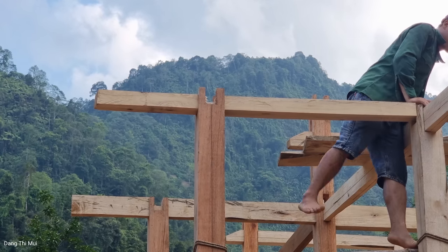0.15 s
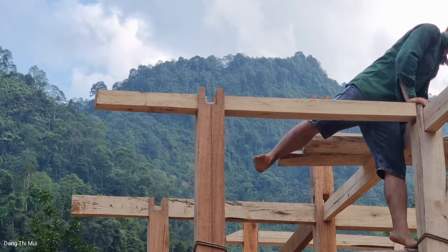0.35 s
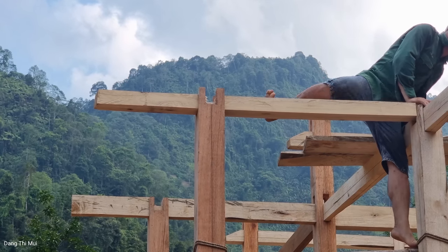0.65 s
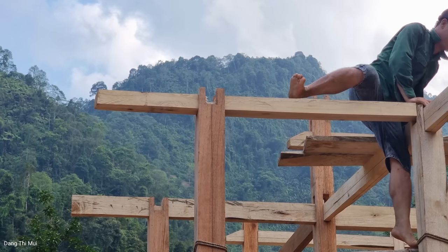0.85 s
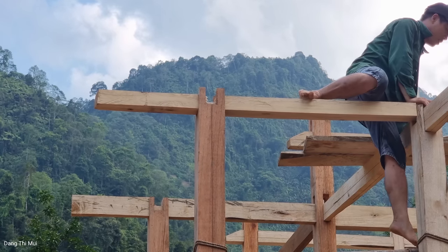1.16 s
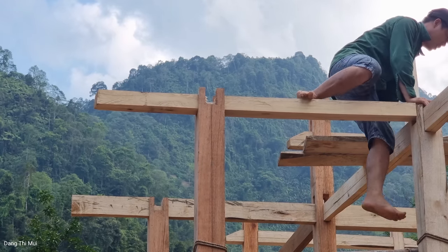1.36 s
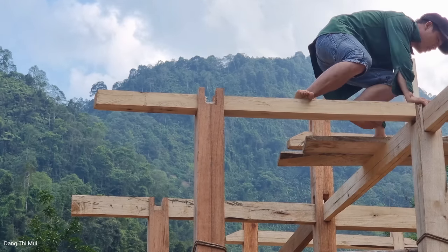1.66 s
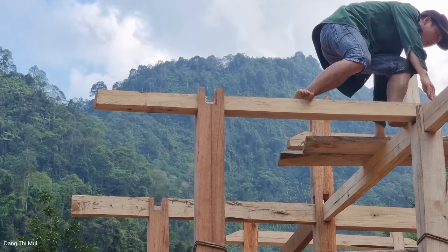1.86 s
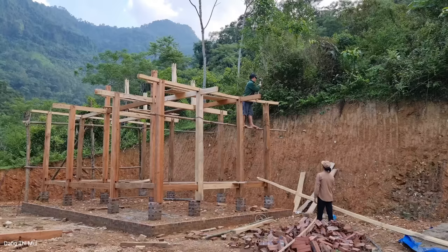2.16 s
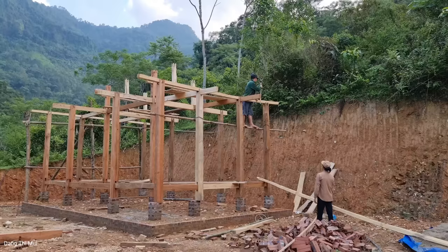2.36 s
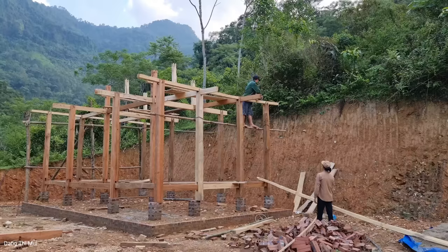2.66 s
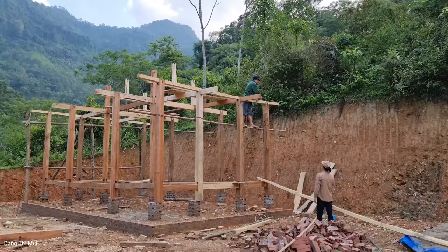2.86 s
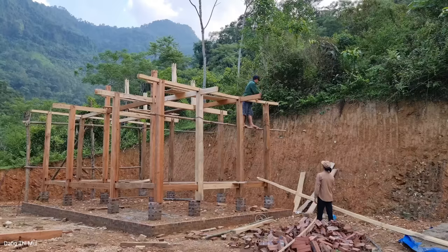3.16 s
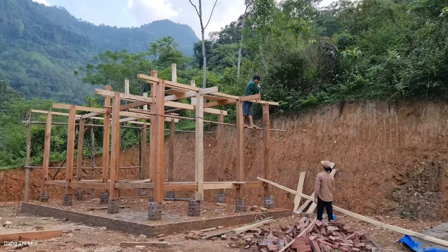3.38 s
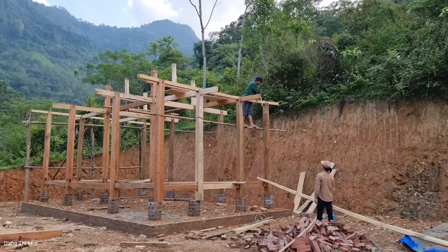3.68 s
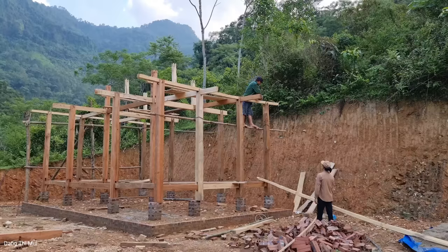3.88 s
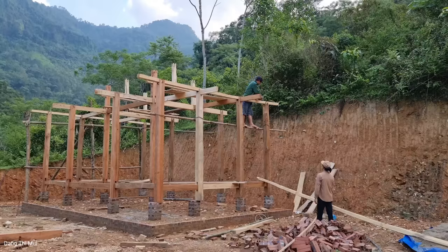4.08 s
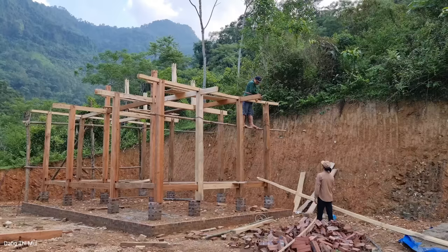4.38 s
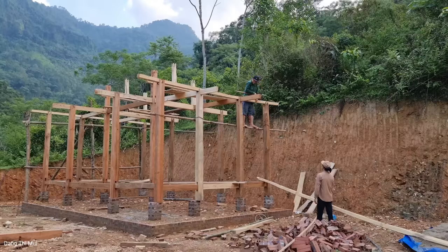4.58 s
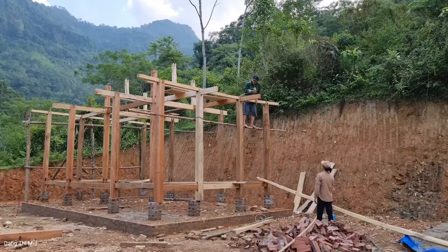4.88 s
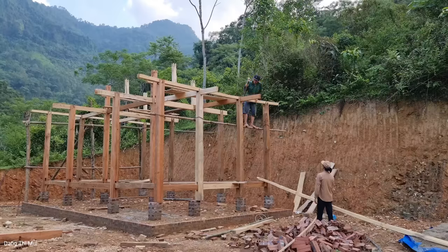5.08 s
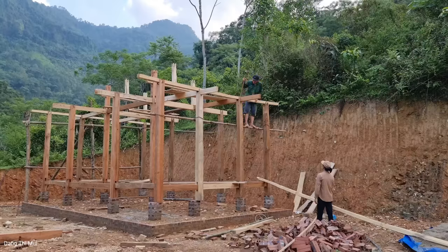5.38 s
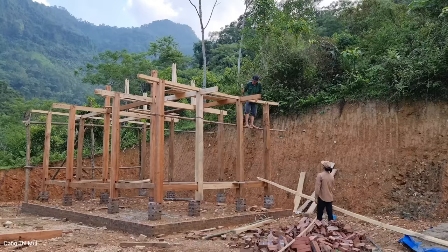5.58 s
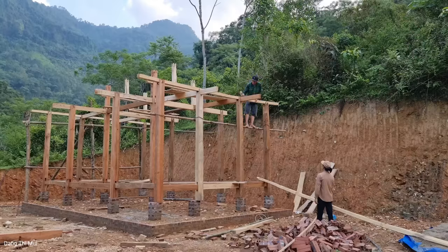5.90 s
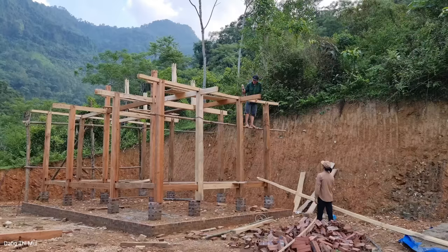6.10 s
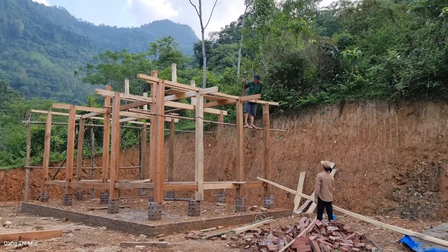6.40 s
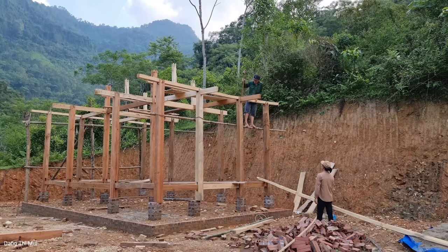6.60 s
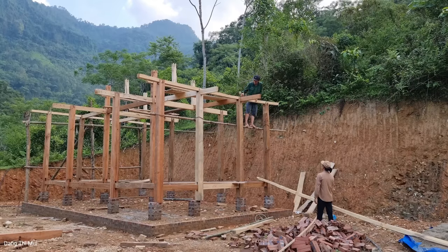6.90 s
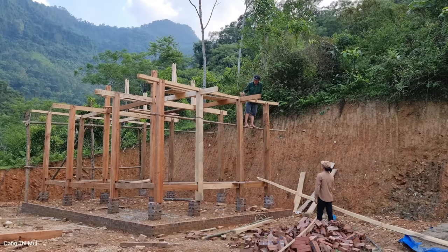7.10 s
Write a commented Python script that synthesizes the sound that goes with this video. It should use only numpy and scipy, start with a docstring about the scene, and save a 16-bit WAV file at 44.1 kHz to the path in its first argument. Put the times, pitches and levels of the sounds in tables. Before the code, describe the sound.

Soft bumps and scuffs of a person climbing on wooden planks sound near the microphone, under a shrill drone of cicadas. After a short dip in the sound, four loud, sharp hammer blows on a timber frame come from farther off, in two slow pairs, with duller knocks of loose wood and a few light taps. The insects keep buzzing throughout in the open air.

```python
"""Hammering a timber frame in the forest

From beside a house frame on a wooded hillside, someone is heard climbing over planks with soft bumps.
The sound fades out and returns from across the yard, where a heavy hammer drives a beam home: four
hard knocks, each ringing the wood and shaking the frame. Near cicadas swell, hold and sag in pitch
as their tymbals wind down, over the buzz and hiss of many far ones."""
import sys
import numpy as np
from scipy import signal
from scipy.fft import rfft, irfft
from scipy.io import wavfile
from scipy.ndimage import map_coordinates

SR = 44100
rng = np.random.default_rng(int(sys.argv[2]) if len(sys.argv) > 2 else 0)


def to_wav(s):
    """Save 16-bit WAV."""
    ch = np.atleast_2d(s).T  # columns
    pcm = np.round(np.clip(ch, -1, 1) * 32767)  # PCM
    wavfile.write(sys.argv[1], SR, pcm.astype(np.int16))


N = 319719
TIME = np.arange(N) / SR
AGE = TIME[:2 ** 15]   # seconds since a strike
BAND_HZ = 40 * 2 ** (np.arange(27) / 3)
LEFT_RIGHT = np.array([[.5], [-.5]])   # splits a difference between the channels
MOVE_S = 2.212   # the microphones move from beside the frame to across the yard


# The hammer, from across the yard. Each row: start in seconds, level in dB, joint ring in Hz and dB,
# thud, clack, crack and rumble in dB, a factor on the frame's ring time, swell in seconds.
HAMMER_BLOWS = [(2.678, 2, 455, -20, 2, -0.5, 2, -3, 0.97, 0.0098),
                (3.873, 4, 405.6, -12.5, 3, -3, -6, -3, 0.88, 0.0095),
                (5.748, 3.5, 466.4, -19, 3.5, -0.5, -1.5, -2, 1.27, 0.011),
                (6.944, 4, 445, -31, 0.5, 0.5, -2.5, -3.5, 1.11, 0.014)]
# The struck beam's clear modes. Each row: pitch in Hz, level in dB, seconds to die by 60 dB (t60).
BEAM_MODES = [(368.6, -19.5, 0.13), (455.3, -18, 0.11), (532.4, -19.5, 0.12), (570, -23, 0.12),
              (638, -32.5, 0.13), (734, -31.5, 0.18), (795, -24.5, 0.11), (864, -17.5, 0.13),
              (985, -22, .12), (1055.5, -25, 0.12), (1160, -23.5, 0.13), (1385, -27.5, 0.16),
              (1517, -32.5, 0.082), (1663, -37, .14), (1950, -39, 0.22)]
# Dense modes of the struck wood. Each row: band in Hz, level in dB, t60 in seconds.
WOOD_BANDS = [(50, -62, .1), (144, -35, .1), (300, -39.5, 0.083), (400, -19, .08), (660, -19, 0.09),
              (900, -19, 0.096), (1390, -23.5, 0.19), (1720, -32, 0.14), (2700, -29.5, 0.11),
              (4070, -33.5, 0.048), (6500, -42.5, 0.16), (10600, -38.5, 0.075), (14900, -46, .13)]
# The whole frame shaking after a blow. Each row: band in Hz, level in dB, t60 in seconds.
FRAME_BANDS = [(40.8, -56, .55), (80, -41.5, 0.44), (160, -38, 0.43), (270, -42, 0.48), (420, -31.5, .5),
               (700, -28, 0.19), (1085, -32, 0.39), (1800, -47, 0.63), (3500, -52, 0.43), (8014, -52, 0.38),
               (15000, -54.5, .22)]
# Fibres cracking as the tenon slips on. Each row: start in seconds, level in dB.
FIBRE_CRACKS = [(3.885, 0), (3.915, 4), (5.784, -6.5), (6.977, -3), (6.999, -8)]
# The tone of one such crack. Each row: band in Hz, level in dB, t60 in seconds.
FIBRE_BANDS = [(300, -72, .05), (900, -33, .06), (1800, -39.5, 0.085), (3500, -40, 0.11),
               (8000, -40.5, .09), (15000, -41.5, 0.12)]
def hammer():
    """Each blow rings the beam and its joint, cracks as the tenon seats, and shakes the frame."""
    out = np.zeros((2, N))
    for s, db, joint_hz, joint_db, thud_db, clack_db, crack_db, rumble_db, hold, swell in HAMMER_BLOWS:
        def colour_db(hz):
            """Where and how squarely the head lands tilts the tone."""
            return (thud_db * bell(hz, 640, 0.97) + clack_db * bell(hz, 950, 0.55)
                    + crack_db * bell(hz, 3200, 0.91))
        modes = [(hz, level + colour_db(hz), t60) for hz, level, t60 in BEAM_MODES]
        beam = ring(modes + [(joint_hz, joint_db, .2)], swell, spread=1.4, chance_db=0.5)
        wood = dense_modes(WOOD_BANDS, swell * 0.83, alike_below_hz=2100, colour_db=colour_db(BAND_HZ))
        frame = dense_modes(stretch(FRAME_BANDS, hold), 0.022, alike_below_hz=1900, bass_lag_hz=70)
        frame *= from_db(1.3 * drift(55)[:len(AGE)])   # shaking passes unevenly from joint to joint
        posts = ring(stretch([(85.9, -37, .5), (155.4, -46, .64)], hold), .027, spread=.5, chance_db=3.5)
        seat = (AGE - swell) / .00016
        crack = from_db(-3.5 + crack_db) * -seat * np.exp(-seat ** 2)
        add(out, s, from_db(db) * (beam + wood + crack + from_db(rumble_db) * (frame + posts)))
    for s, db in FIBRE_CRACKS:
        add(out, s, from_db(db) * dense_modes(FIBRE_BANDS, 0.001, alike_below_hz=2000))
    return out


# Lighter knocks, across the yard: timbers settling in their joints, and at 3.932 s the hammer landing a second
# time just after a blow. Each row: start in seconds, level in dB, low-pass edge in Hz.
TIMBER_KNOCKS = [(2.868, -32.5, 2000), (3.932, -12, 1685), (4.071, -17.5, 850), (4.094, -21.5, 440),
                 (5.685, -24.5, 900), (5.808, -32, 1800), (5.865, -17.5, 1610), (5.915, -19, 700),
                 (5.973, -36, 1500), (6.186, -35.5, 80), (7.085, -19.5, 820), (7.136, -28, 990)]
def light_knocks():
    """Timbers knock in their joints and the hammer lands once more after a blow, all duller and lighter than a
    full blow on the same wood."""
    out = np.zeros((2, N))
    for s, db, dull_hz in TIMBER_KNOCKS:
        knock = from_db(1) * ring(stretch(BEAM_MODES, 1.1), 0.0054, spread=0.93, chance_db=1.5)
        shake = from_db(8.5) * dense_modes(stretch(FRAME_BANDS, 0.66), 0.0091, alike_below_hz=730)
        add(out, s, from_db(db) * butter(knock + shake, dull_hz, "low"))
    return out


# Sliding over the beam, close by. Each row: start and length in seconds, level in dB.
BEAM_SLIDES = [(0.036, 0.091, -59), (0.178, 0.53, -76.5), (0.732, 0.516, -69)]
def sliding():
    """The climber rubs along the wood: low, uneven noise that eases in and out."""
    edge_s = 0.088
    gain = sum(from_db(db) * ramp(s, edge_s) * ramp(s + length, -edge_s) for s, length, db in BEAM_SLIDES)
    rub = steady_noise([(240, -18), (335, 3), (420, -7), (600, -10)], 140, 620, likeness=0.8)
    return gain * rub * from_db(2 * drift(14.15))


# Feet and knees, close by. Each row: start in seconds, level in dB, upper knock in dB.
PLANK_STEPS = [(0.349, -46.5, -4), (0.411, -53.5, -10), (0.47, -57, 2), (0.754, -51, 2),
               (1.224, -53.5, 3.5), (1.261, -51.5, -26), (1.414, -52, -19), (1.46, -45, -6),
               (1.647, -45, -4), (1.697, -43.5, -7), (1.743, -43, -8), (1.775, -46.5, -3),
               (1.832, -46.5, -13), (1.974, -50, -2)]
# The planks underfoot. Each row: pitch in Hz, level in dB, t60 in seconds.
PLANK_MODES = [(235, -5.5, 0.18), (307, 2, 0.12), (395, -9.5, 0.37), (511, -4.5, 0.24), (569, -12, 0.35),
               (780, -17, 0.092), (890, -5.5, 0.23), (1080, -4, 0.2), (1130, -4.5, 0.22),
               (1283, -1.5, 0.093), (1508, -2, 0.077), (1750, -7, .1)]
def climber():
    """Each soft bump rings the planks and scuffs them."""
    out = np.zeros((2, N))
    for s, db, upper_db in PLANK_STEPS:
        tuning = 1 + .025 * rng.normal()   # weight on another spot retunes the planks
        modes = [(hz * tuning, level + (upper_db + 2.5) * bell(hz, 1600, 0.83), t60)
                 for hz, level, t60 in PLANK_MODES]
        friction = rms_one(butter(stereo_noise(0.2, len(AGE)), [215, 1450], "band", order=4))
        scuff = from_db(-11) * friction * swell_and_die(0.00096, 0.19)
        plank = from_db(-12) * ring(modes, 0.0055, spread=0.99, chance_db=4.5)
        add(out, s, from_db(db) * (plank + scuff))
    return out


# Taps between blows, across the yard. Each row: start in seconds, level in dB.
WOOD_TAPS = [(4.773, -50), (4.809, -42), (5.297, -53.5), (6.775, -50.5)]
# The tone of one tap. Each row: band in Hz, level in dB, t60 in seconds.
TAP_BANDS = [(400, -52, .08), (850, -14, 0.078), (1400, -8.5, 0.073), (1810, 0, 0.026), (3000, -33, .04),
             (8000, -45, .03)]
def taps():
    """Light touches briefly stir the wood's dense modes."""
    out = np.zeros((2, N))
    for s, db in WOOD_TAPS:
        add(out, s, from_db(db + 0.5) * dense_modes(TAP_BANDS, 0.0012, alike_below_hz=1600))
    return out


# Three cicada songs, near the microphones. Each row: partial in Hz, level in dB.
SHRILL_PARTIALS = [(2676, -85), (2972, -79), (3128, -75), (3273, -58), (3569, -63.5), (3865, -81),
                   (4167, -58.5), (4463, -58), (4759, -57.5), (5055, -57.5), (5351, -53), (5647, -65),
                   (6243, -85), (6540, -75)]
LOW_PARTIALS = [(2401, -73), (2702, -63), (3004, -60.5), (3138, -59.5), (3305, -61), (3607, -61),
                (3903, -62), (4054, -69), (4204, -55.5), (4355, -64.5), (4495, -66), (4657, -60),
                (4791, -76.5), (4969, -59), (5103, -68.5), (5238, -71), (5545, -69), (6008, -84),
                (6158, -73.5), (6293, -66)]
FALLING_PARTIALS = [(2283, -62), (2422, -64), (2568, -68.5), (2710, -62), (2853, -56.5), (2998, -53),
                    (3138, -60), (3282, -59), (3424, -57), (3567, -60.5), (3709, -62.5), (3852, -61.5),
                    (3995, -67.5), (4136, -61.5), (4422, -57.5), (4708, -54), (4992, -58), (5136, -65.5),
                    (5278, -61.5), (5565, -69), (5990, -71), (6135, -61), (6420, -61), (6885, -75.5)]
# The abdomen's resonance in each song. Each row: time in seconds, centre in Hz.
SHRILL_BODY = [(.1, 5380), (.2, 5100), (.36, 5030), (.6, 4500), (1.1, 4200)]
LOW_BODY = [(1.0, 2820), (1.3, 2700), (1.65, 2770), (1.85, 3070)]
FALLING_BODY = [(2.7, 3153), (3.15, 3540), (3.7, 3454), (4.5, 4826)]
# The calls. Each row: microphone spot, song, end of swell and start of dying in seconds, level in dB,
# dying in dB per second, resonance lift in dB, waver as a share of speed, flicker in dB,
# left minus right in dB and in radians.
NEAR_CALLS = [("frame", "shrill", 0, .02, 9, 11.6, 6.6, 0.00053, 1.4, 3.3, 0.44),
              ("frame", "low", 1.32, 1.72, 9.6, 11, 10.9, 0.0017, 2.85, 0.22, 0.43),
              ("yard", "falling", 2.5, 2.15, 4.6, 6.2, 4.5, .0017, 4.5, 1.5, 0.5),
              ("yard", "falling", 1.6, 4.5, -3, 12, 4.5, 0.0018, 3.5, 2, 2.3)]
# The tymbal behind each call. Each row: speed ratio, its creep per second, midpoint and time scale
# of the slackening in seconds, speed ratio lost.
TYMBAL_SPEEDS = [(.999, .0085, 2.0, .15, .016), (.988, .0085, 1.95, .15, .012), (1.001, 0, 3.65, .27, .062),
                 (1.012, 0, 4.1, .35, .058)]
def near_cicadas():
    """Calls swell and die away; their pitch holds or creeps up, then sags as the tymbal slackens."""
    voices = {"shrill": (SHRILL_PARTIALS, SHRILL_BODY), "low": (LOW_PARTIALS, LOW_BODY),
              "falling": (FALLING_PARTIALS, FALLING_BODY)}
    out, swell_db_per_s = 0, 4.5
    for call, (ratio, creep, slack_s, slack_length, sag) in zip(NEAR_CALLS, TYMBAL_SPEEDS):
        spot, voice, full_s, until_s, db, dying, lift_db, waver, flicker_db, pan_db, apart = call
        effort_db = db - swell_db_per_s * np.maximum(full_s - TIME, 0)
        effort_db -= dying * np.maximum(TIME - until_s, 0)
        speed = ratio + creep * TIME - sag / (1 + np.exp((slack_s - TIME) / slack_length))
        song = cicada(*voices[voice], speed, lift_db, waver, flicker_db, apart)
        out += heard_at(spot) * from_db(effort_db + pan_db * LEFT_RIGHT) * song
    return out


def cicada(partials, body, speed, lift_db, waver, flicker_db, apart):
    """All partials follow the tymbal's speed; the abdomen lifts those near its resonance."""
    tymbal_time = np.cumsum(speed * (1 + waver * drift(30))) / SR
    slow_time = TIME[::64]
    body_hz = np.interp(slow_time, *np.transpose(body))
    out = np.zeros((2, N))
    for hz, db in partials:
        turn = 2 * np.pi * (hz * tymbal_time + rng.random())
        body_db = lift_db * (bell(hz, body_hz, octaves=.06) - 0.8)
        for channel, phase in zip(out, apart * rng.choice([-1, 1]) * LEFT_RIGHT):
            # paths through moving leaves make level and phase shimmer, differently on each side
            flicker = map_coordinates(rng.standard_normal(256), [slow_time * 11], mode="wrap")
            sway = map_coordinates(rng.standard_normal(256), [slow_time * 11], mode="wrap")
            level = from_db(db + body_db + flicker_db * flicker)
            channel += full_rate(level) * np.sin(turn + full_rate(phase + .7 * sway))
    return out


# Far cicadas all round the site, their buzz and their hiss. Each row: frequency in Hz, level in dB.
FAR_BUZZ = [(1500, -24), (1900, -9.5), (2250, -2.5), (2550, -5.5), (2950, 1.5), (3400, -2.5), (4000, -2),
            (4800, 0), (5350, -1.5), (5800, -8)]
FAR_HISS = [(5900, -12), (6400, -6), (6800, 1), (7150, 3.5), (7700, -5), (8400, -6.5), (9000, -16),
            (10500, -20.5), (12500, -28.5), (15000, -16)]
def far_cicadas():
    """Many songs merge into noise; their nearly equal tymbal rates leave a ripple in its spectrum."""
    low = bed("low buzz") * steady_noise(FAR_BUZZ, 1600, 3800, likeness=-.05, ripple_db=2.8)
    middle = bed("middle buzz") * steady_noise(FAR_BUZZ, 3800, 5900, likeness=-0.11, ripple_db=1)
    middle *= from_db(2.4 * LEFT_RIGHT)
    high = bed("hiss") * steady_noise(FAR_HISS, 5900, 15000, likeness=-0.025)
    return lull(depth_db=3.1, length_s=1.6) * (low + middle) + high


# A faint breeze on the hillside. Each row: frequency in Hz, level in dB.
BREEZE_SPECTRUM = [(200, -11), (290, -8), (370, 0.5), (500, 3), (700, -3), (1200, -4.5), (1900, -7)]
def air():
    """A wavering breeze over the deep rumble of the air."""
    gusts = bed("breeze") * lull(depth_db=17, length_s=1) * from_db(1.5 * drift(10))
    breeze = gusts * steady_noise(BREEZE_SPECTRUM, 170, 1900, likeness=0.49)
    rumble = steady_noise([(25, -7), (60, 1), (110, -5), (200, -11)], 20, 200, likeness=.9)
    return breeze + bed("rumble") * rumble


# The background beside the frame and across the yard. Each entry: level on arrival in dB,
# trend in dB per second.
BED_LEVELS = {"frame": {"low buzz": (-60, 1.0), "middle buzz": (-58.5, 1), "hiss": (-48.5, -0.42),
              "breeze": (-74, 0), "rumble": (-82, 3.4)}, "yard": {"low buzz": (-51.5, -1.5),
              "middle buzz": (-50.5, -1.7), "hiss": (-51.5, 0), "breeze": (-69.5, -0.54),
              "rumble": (-84, -1.2)}}
def bed(name):
    """Gain of a background layer, holding or slowly changing at each spot."""
    gain = 0
    for spot, arrival_s in (("frame", 0), ("yard", MOVE_S)):
        db, trend = BED_LEVELS[spot][name]
        gain += heard_at(spot) * from_db(db + trend * (TIME - arrival_s))
    return gain


def hillside_echo(x):
    """A faint echo returns from the wooded slope, smeared by the trees."""
    scatter = rng.standard_normal((2, len(AGE))) * swell_and_die(0.0053, 0.35)
    scatter /= np.sqrt(np.sum(scatter ** 2) / 2)
    echo = signal.fftconvolve(butter(x, [600, 1500], "band"), scatter, axes=1)
    return from_db(-38.5) * np.pad(echo, ((0, 0), (int(.29 * SR), 0)))[:, :N]


# The frame's sound at the microphone pair. Each row: frequency in Hz, left minus right in dB.
PAIR_BALANCE = [(60, 1), (380, 0.5), (950, -0.55), (2400, 0), (15000, -2)]
def at_microphones(x):
    """The two sides differ a little in level, and the left hears the sound first."""
    hz, lead_s = np.arange(N // 2 + 1) * SR / N, .00003
    balance = from_db(LEFT_RIGHT * at_hz(PAIR_BALANCE, hz)[0])
    return irfft(rfft(x) * balance * np.exp(2j * np.pi * LEFT_RIGHT * hz * lead_s), N)


def ring(modes, swell, spread, chance_db):
    """Each mode has its own strength and phase; the sides differ by spread radians per kHz."""
    out = 0
    for hz, db, t60 in modes:
        phase = rng.uniform(0, 2 * np.pi) + spread * hz / 1000 * rng.choice([-1, 1]) * LEFT_RIGHT
        strength = from_db(db + chance_db * rng.normal())
        out += strength * np.sin(2 * np.pi * hz * AGE + phase) * swell_and_die(swell, t60)
    return out


def dense_modes(table, swell, alike_below_hz, colour_db=0, bass_lag_hz=1):
    """Modes too close to tell apart: third-octave noise dying band by band."""
    out, white = 0, rng.standard_normal((2, 2, len(AGE) * 5 // 4))
    levels, t60s = at_hz(table, BAND_HZ)
    for k, (hz, db, t60) in enumerate(zip(BAND_HZ, levels + colour_db, t60s)):
        mid, side = butter(white[k % 2], [hz / 2 ** (1 / 6), hz * 2 ** (1 / 6)], "band")[:, -len(AGE):]
        width = hz / np.hypot(hz, alike_below_hz)   # long waves reach both sides alike
        band = mid + 2 * LEFT_RIGHT * width * side
        shape = swell_and_die(swell * (1 + bass_lag_hz / hz), t60)   # slow bending waves: late bass
        out += from_db(db) * rms_one(band * shape) * np.sqrt(np.mean(shape ** 2))
    return out


def swell_and_die(swell, t60):
    """Vibration builds up through the wood, then dies away."""
    return np.minimum(AGE / swell, 1) ** 2.2 * from_db(-60 * np.maximum(AGE - swell, 0) / t60)


def stretch(modes, factor):
    """The same modes with their ring times scaled."""
    return [(hz, db, t60 * factor) for hz, db, t60 in modes]


def steady_noise(spectrum, low_hz, high_hz, likeness, ripple_db=0):
    """Coloured noise of rms 1, with an optional ripple spaced at the tymbal rate."""
    hz, tymbal_hz = np.arange(N // 2 + 1) * SR / N, 137.5
    level_db = at_hz(spectrum, hz)[0] + ripple_db * np.cos(2 * np.pi * hz / tymbal_hz)
    gain = from_db(level_db) * (hz > low_hz) * (hz < high_hz)
    return rms_one(irfft(rfft(stereo_noise(likeness, N)) * gain, N))


def stereo_noise(likeness, size):
    """White noise with a given left-right correlation."""
    mid, side = rng.standard_normal((2, size))
    return np.sqrt(1 + likeness) * mid + np.sqrt(1 - likeness) * side * 2 * LEFT_RIGHT


def drift(rate):
    """A smooth random curve through rate knots a second."""
    return full_rate(map_coordinates(rng.standard_normal(2048), [TIME[::64] * rate], mode="wrap"))


def full_rate(slow):
    """Hold each value for 64 samples."""
    return slow.repeat(64)[:N]


def heard_at(spot):
    """True while the microphones are at this spot."""
    return (TIME >= MOVE_S) == (spot == "yard")


def lull(depth_db, length_s):
    """A gain that drops at the move and recovers steadily."""
    return from_db(-depth_db * heard_at("yard") * (1 - ramp(MOVE_S, length_s)))


def ramp(s, length):
    """Rises from 0 at time s to 1 over this length; a negative length looks back in time."""
    return np.clip((TIME - s) / length, 0, 1)


def bell(hz, centre_hz, octaves):
    """A bell curve over log frequency."""
    return np.exp(-(np.log2(hz / centre_hz) / octaves) ** 2)


def at_hz(rows, hz):
    """All columns of a spectrum at these frequencies."""
    row_hz, *columns = np.transpose(rows)
    return [np.interp(np.log(hz + 1e-9), np.log(row_hz), column) for column in columns]


def butter(x, hz, kind, order=2):
    """Causal Butterworth filter."""
    return signal.sosfilt(signal.butter(order, np.clip(hz, 10, .45 * SR), kind, fs=SR, output="sos"), x)


def add(out, s, sound):
    """Mix a short stereo sound in at time s."""
    start = int(s * SR)
    out[:, start:start + len(AGE)] += sound[:, :N - start]


def from_db(db):
    """Decibels to gain."""
    return 10 ** (np.asarray(db) / 20)


def rms_one(x):
    """Scale to unit rms."""
    return x / np.sqrt(np.mean(x ** 2) + 1e-20)


def gain_control(x, threshold_db, most_db, attack_s, release_db_per_s):
    """A loud sound turns the gain down a little; it creeps back up."""
    over_db = np.clip(20 * np.log10(np.abs(x).max(axis=0) + 1e-9) - threshold_db, 0, most_db)
    held_db = np.maximum.accumulate(over_db + release_db_per_s * TIME) - release_db_per_s * TIME
    pole = np.exp(-1 / (attack_s * SR))
    return x * from_db(-signal.lfilter([1 - pole], [1, -pole], held_db))


def scene():
    """The work and the forest, fading out gently before the move and quickly back in after it."""
    blows = at_microphones(hammer() + light_knocks())
    work = blows + hillside_echo(blows) + sliding() + climber() + taps()
    forest = far_cicadas() + air() + near_cicadas()
    fade = ramp(2.14, -0.16) ** 1.27 + ramp(MOVE_S, 0.071) ** 0.36 + from_db(-63.5)
    return (work + forest) * fade


def record(dry):
    """Blows duck the gain, peaks are rounded, the deepest bass rolls off and the top is cut."""
    ducked = gain_control(dry, threshold_db=-14, most_db=2.0, attack_s=.09, release_db_per_s=0.7)
    rounded = ducked / (1 + ducked ** 6) ** (1 / 6)
    thinned = butter(rounded, 31, "high")
    return signal.sosfilt(signal.cheby2(16, 70, 16600, fs=SR, output="sos"), thinned)


dry = scene()
out = record(dry)
to_wav(out)
```